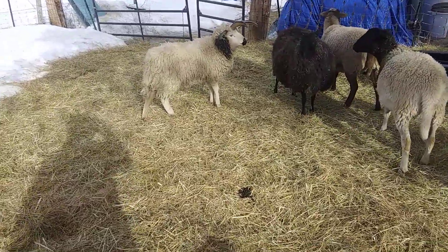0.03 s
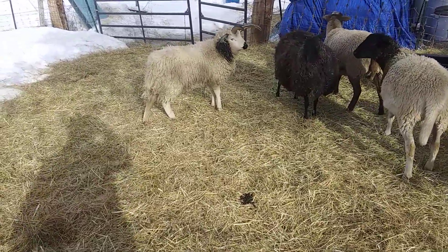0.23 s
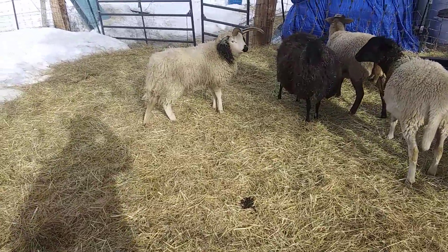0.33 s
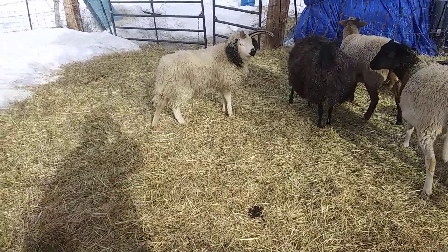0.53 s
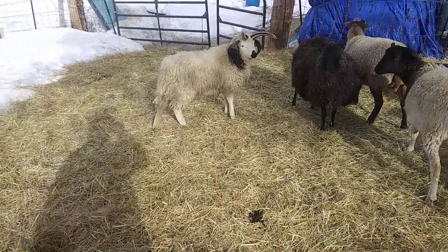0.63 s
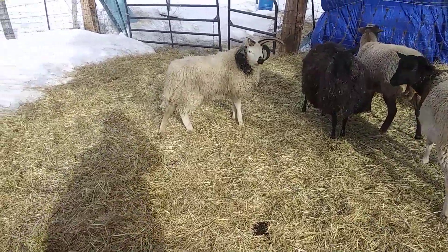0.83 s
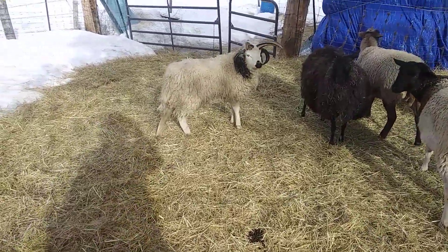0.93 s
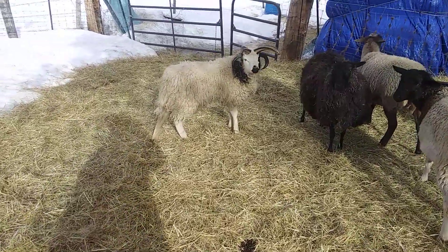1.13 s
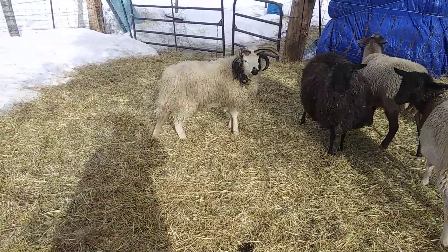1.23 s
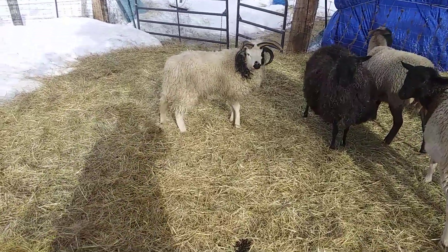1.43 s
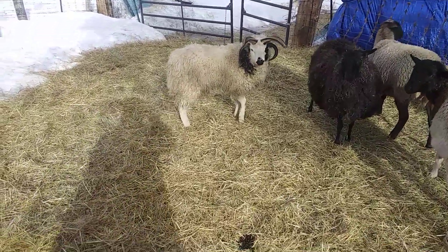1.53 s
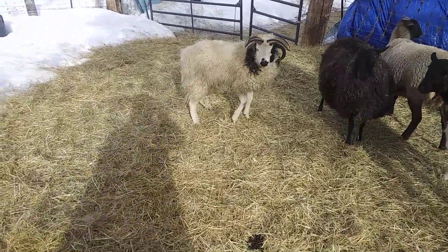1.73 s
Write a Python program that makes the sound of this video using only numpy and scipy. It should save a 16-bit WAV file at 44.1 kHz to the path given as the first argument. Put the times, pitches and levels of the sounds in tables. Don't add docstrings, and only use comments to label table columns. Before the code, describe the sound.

One sheep bleats nearby, starting with a closed-mouth throb and opening into a rough, rapidly fluttering baa of under a second; soft hoof thumps and straw rustle follow in an outdoor pen, with faint microphone hiss.

```python
import sys
import numpy as np
from scipy import signal
from scipy.fft import rfft, irfft
from scipy.io import wavfile
from scipy.ndimage import uniform_filter1d

SR = 44100
rng = np.random.default_rng(int(sys.argv[2]) if len(sys.argv) > 2 else 0)


def bounce(signal):
    frames = np.transpose(np.atleast_2d(signal))
    limited = np.clip(frames, -1, 1)
    pcm = np.round(limited * 32767).astype(np.int16)
    wavfile.write(sys.argv[1], SR, pcm)


def decibels_to_gain(level_db):
    exponent = np.asarray(level_db, float) / 20
    return 10 ** exponent


N = 79380

# frequency in Hz, level in dB per Hz.
AIR_SPECTRUM = [(25, -2), (60, -0.5), (150, -1.5), (700, -1.5), (1500, -12.5), (3500, -19), (5000, -29.5),
                (15800, -22.5)]
# time in seconds, level in dB.
STIRRING = [(0.0, -62.5), (.05, -59), (.08, -91), (.14, -61.5), (.18, -66.5), (.6, -46), (1.05, -66),
            (1.14, -62.5), (1.24, -70), (1.33, -62.5), (1.36, -60), (1.46, -61), (1.535, -65),
            (1.555, -52.5), (1.61, -58), (1.65, -52), (1.7, -57), (1.8, -60.5)]
# frequency in Hz, level in dB per Hz.
STRAW_SPECTRUM = [(100, -26), (300, -8), (800, -13.5), (1410, -7.5), (2500, -17), (3860, -18),
                  (5000, -36.5), (15800, -35)]
# time in seconds, level in dB.
SLIDING = [(0.0, -79), (.12, -77), (.2, -63.5), (.3, -82.5), (.6, -77), (.9, -79), (.96, -66), (1.04, -77),
           (1.1, -65), (1.2, -68.5), (1.3, -76), (1.37, -66.5), (1.47, -68.5), (1.52, -68), (1.58, -67),
           (1.72, -61.5), (1.77, -71.5)]
# frequency in Hz, level in dB per Hz.
STALK_SPECTRUM = [(3000, -28), (5000, -8), (6200, 3), (8000, 4), (11000, 1.5), (13500, 6), (15500, -13)]
# centre in seconds, effort in dB, pitch in Hz, length in seconds,
# chest tone in dB.
THROBS = [(.016, -56, 138.9, 0.024, -49.5), (0.036, -61, 139.4, .02, -49),
          (.13, -39.5, 175.6, 0.035, -46.5), (.202, -34.5, 135.1, .022, -57),
          (.228, -38.5, 148.9, 0.033, -53), (0.298, -32.5, 151.8, 0.026, -50),
          (0.366, -32.5, 151.8, 0.0323, -46.5), (0.448, -33.5, 147.1, 0.027, -43),
          (0.514, -33.5, 156.4, 0.029, -44.5), (0.592, -31.5, 149, 0.026, -42),
          (0.675, -31, 157.7, 0.0384, -40), (0.761, -31.5, 149.4, 0.029, -41.5),
          (0.846, -31.5, 152.6, 0.029, -43), (0.934, -35, 143.5, 0.034, -43.5),
          (0.993, -67, 139.4, 0.017, -41.5)]
# time in seconds, mouth opening from 0 to 1, hoarse air in dB.
MOUTH = [
    (0.101, 0.2, -42),
    (.183, 0, -34),
    (0.202, 0.43, -18),
    (.24, 0.66, -8.5),
    (.3, 0.73, -7),
    (0.421, 0.87, -5.6),
    (.9, 0.86, -9.5),
    (0.966, 0.82, -11.5),
    (1.01, 0.54, -44),
]
# Hz with mouth half open, Hz with mouth open, width in Hz,
# level for pulses in dB, level for air in dB.
THROAT = [(540.4, 728, 157.6, 2.1, 3), (1635, 1614, 195, -3, -2), (2197, 2587, 290, -10, 1),
          (2820, 3047, 300, -18.5, -5), (3240, 3620, 376, -21, -10), (3998, 4480, 540, -23, -23.5),
          (965, 860, 450, -22.5, -55), (390, 332, 161, -18, -53), (6000, 4300, 3000, -42.5, -36),
          (270, 174, 216, -19.5, -12.5)]
# frequency in Hz, time to fall 60 dB in seconds.
PEN_DECAY = [(200, 0.26), (700, 0.3), (2500, 0.2), (6000, 0.14)]
# start in seconds, peak level in dB, ring in Hz.
SNAPS = [(0.1103, -61, 7400), (0.254, -52, 7400), (.3018, -39.5, 7560), (.644, -54, 15000),
         (0.69, -65, 15000), (0.954, -53, 14540), (1.0505, -56, 6450), (1.0818, -48.5, 11120),
         (1.355, -59, 7220), (1.4351, -50, 9300), (1.4593, -44.5, 7440), (1.754, -47, 15300)]
HOOF_TIMES = [.135, .24, .62, .7, .84, .945, .972, 1.003, 1.052, 1.061, 1.135, 1.19, 1.314, 1.37, 1.6,
              1.628, 1.672]
# peak level in dB, pitch in Hz, length in cycles.
THUMPS = [(-49.5, 105, 3.3), (-50, 72, 1.5), (-61, 64, 3.5), (-45.5, 81, 1.65), (-44.5, 146, 4.4),
          (-40, 75, 1.86), (-47, 62, 2.8), (-58, 72, 7.5), (-41, 95, 2.3), (-44, 180, 2), (-42, 68, 0.83),
          (-50.5, 122, 2.2), (-45, 103, 2.2), (-59, 75, 4.3), (-50, 118, 2.3), (-42.5, 103, 1.3),
          (-48, 100, 2.3)]
# frequency in Hz, gain in dB.
MIC = [(4000, 1.11), (5200, 4.5), (7000, 0.5), (13500, -7.3), (15600, -1), (15900, 1), (16050, -54)]


def evened(x):
    return x / np.sqrt(np.mean(x ** 2) + 1e-20)


def read(points, hz):
    f, value = np.transpose(points)
    return np.interp(np.log(hz + 1), np.log(f + 1), value)


def colour(x, points):
    return irfft(rfft(x) * decibels_to_gain(read(points, np.fft.rfftfreq(N, 1 / SR))), N)


def resonate(x, hz, width):
    turn = np.exp(2j * np.pi * np.cumsum(hz * np.ones(len(x))) / SR)
    r = np.exp(-np.pi * width / SR)
    return 2 * (turn * signal.lfilter([1 - r], [1, -r], x / turn + 1e-18)).real


def bell(t, centre, length):
    return np.exp(-((t - centre) / (.5 * length)) ** 2)


def air():
    return decibels_to_gain(-58) * evened(colour(rng.standard_normal(N), AIR_SPECTRUM))


def straw(curve, spectrum, per_s, spread_db):
    clump = decibels_to_gain(1.74 * evened(uniform_filter1d(rng.standard_normal(N), size=500)))
    strikes = rng.random(N) < per_s / SR
    sizes = decibels_to_gain(spread_db * np.minimum(rng.exponential(1, N), 4))
    grains = strikes * rng.standard_normal(N) * sizes
    level_db = np.interp(np.arange(N) / SR, *np.transpose(curve))
    return decibels_to_gain(level_db) * evened(colour(clump * grains, spectrum))


def hoarse_air(push, peak, turns, air_db):
    lag_s, tail_s, hold_db, gate_depth = .0077, .0061, -5.5, .53
    tail = np.exp(-np.arange(4000) / SR / tail_s)
    gust = signal.oaconvolve(push / peak, tail / tail.sum())[:N]
    gust = np.roll(gust, round(lag_s * SR))
    gate = 1 - gate_depth + 2 * gate_depth * np.exp(-(turns % 1) / 0.55)
    return decibels_to_gain(-38.5 + air_db) * (decibels_to_gain(hold_db) + gust) * gate * rng.standard_normal(N)


def throat(folds, puffs, rush, mouth):
    shut = np.clip(1 - mouth, 0, 1)
    out = np.zeros(N)
    for k, (half_hz, open_hz, width, pulse_db, rush_db) in enumerate(THROAT):
        f = open_hz + (half_hz - open_hz) * 2 * (1 - mouth)
        clear = np.exp(-(open_hz / 2200) ** 2 / 2)
        pulses = clear * folds + 2 * np.sqrt(1 - clear ** 2) * puffs
        drive = np.clip(mouth, 0, 1) * decibels_to_gain(pulse_db + 10.5) * pulses + decibels_to_gain(rush_db + 18.5) * rush
        shut_db = 16.5 * shut * (open_hz / 3500) ** 2 * (open_hz < 5000)
        ring = resonate(resonate(drive / decibels_to_gain(shut_db), f, width), f, 2 * width)
        if k == 0:
            ring = ring * decibels_to_gain(-12 * shut)
        out += (-1) ** k * ring
    half_hz, open_hz = THROAT[0][:2]
    f = open_hz + (half_hz - open_hz) * 2 * (1 - mouth)
    half_open = np.clip(.92 - mouth, 0, .25) * np.clip(2 * mouth, 0, 1)
    return out + decibels_to_gain(19) * resonate(half_open * folds, f, 51)


def bleat():
    jitter, sag, shimmer_db, smear_s = .018, .03, 1.5, .0029
    t = np.arange(N) / SR
    at, effort_db, pitch_hz, length, chest_db = np.transpose(THROBS)
    when, opening, air_db = np.transpose(MOUTH)
    mouth = np.interp(t, when, opening)
    swells = np.array([bell(t, s, w) for s, w in zip(at, length)])
    push = decibels_to_gain(effort_db) @ swells

    wobble = evened(uniform_filter1d(rng.standard_normal(N), size=300))
    hz = np.interp(t, at, pitch_hz) * (1 + jitter * wobble - sag * (1 - swells.max(0)))
    turns = np.cumsum(hz) / SR
    sizes = decibels_to_gain(shimmer_db * np.interp(turns, np.arange(400), rng.standard_normal(400)))

    overtones = sum(np.cos(2 * np.pi * k * turns + 0.0287 * k * k) for k in range(2, 30))
    folds = push * sizes * evened(overtones)
    burst = 0.083 + np.exp(-(turns % 1) / hz / smear_s)
    puffs = push * sizes * evened(burst * rng.standard_normal(N))
    rush = hoarse_air(push, decibels_to_gain(effort_db.max()), turns, np.interp(t, when, air_db))

    hum = np.sin(2 * np.pi * turns) + decibels_to_gain(-11.5) * np.sin(4 * np.pi * turns)
    chest = decibels_to_gain(chest_db + 2.5) @ swells ** 1.86 * np.sqrt(sizes) * hum
    return throat(folds, puffs, rush, mouth), chest


def pen(x):
    taps = np.zeros(SR // 2)
    at = np.arange(round(.014 * SR), SR // 2 - 20, 20)
    taps[at + rng.integers(0, 20, len(at))] = rng.choice([-1., 1.], len(at))
    hz, t, z = signal.stft(taps, SR, nperseg=256)
    fade = decibels_to_gain(-60 * t / read(PEN_DECAY, hz)[:, None])
    tail = signal.istft(z * fade, SR, nperseg=256)[1]
    return decibels_to_gain(-12) * signal.fftconvolve(x, tail / np.linalg.norm(tail))[:N]


def snaps():
    out, t = np.zeros(N), np.arange(400) / SR
    for s, db, hz in SNAPS:
        burst = rng.standard_normal(400) * np.exp(-t / 0.0021)
        ring = evened(resonate(burst, hz, 680)) + 0.75 * evened(resonate(burst, hz, 4500.))
        start = round(s * SR)
        part = out[start:start + 400]
        part += decibels_to_gain(db) * ring / abs(ring).max()
    return out


def hooves():
    t = np.arange(N) / SR
    out = np.zeros(N)
    for s, (db, hz, cycles) in zip(HOOF_TIMES, THUMPS):
        falling = 1 - 3 * np.clip(t - s, -.05, .05)
        out += decibels_to_gain(db) * bell(t, s, cycles / hz) * np.sin(2 * np.pi * hz * (t - s) * falling)
    return out


def scene():
    rustle = straw(STIRRING, STRAW_SPECTRUM, per_s=7000, spread_db=2.5)
    slide = straw(SLIDING, STALK_SPECTRUM, per_s=6000, spread_db=-4.0)
    voice, chest = bleat()
    sheep = voice + chest
    return (air() + rustle + slide + sheep + pen(sheep) + snaps() + hooves())[None]


def roll_off(x):
    return signal.sosfilt(signal.butter(12, 15920, fs=SR, output="sos"), x)


def record(dry):
    bass_cut = signal.butter(3, 50, "high", fs=SR, output="sos")
    mix = signal.sosfilt(bass_cut, colour(dry, MIC))
    return roll_off(mix)


dry = scene()
out = record(dry)
bounce(out)
```